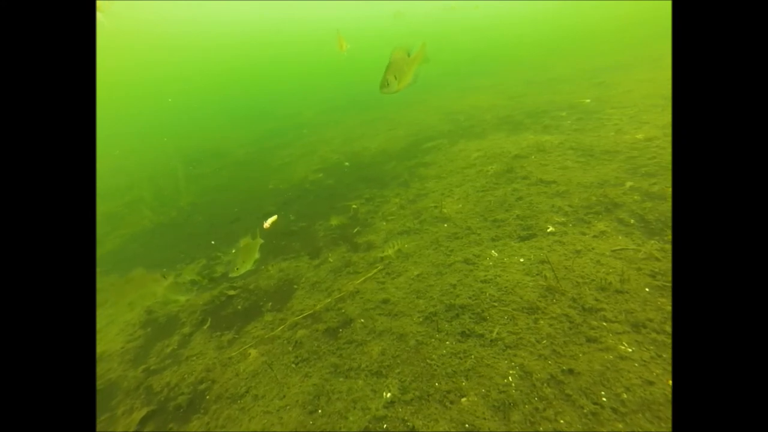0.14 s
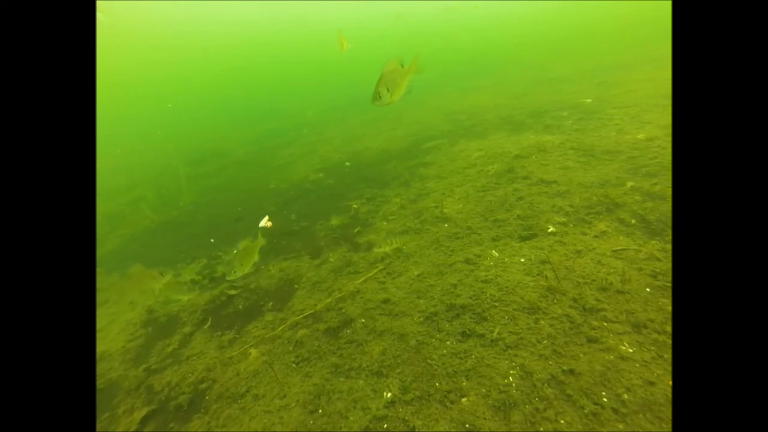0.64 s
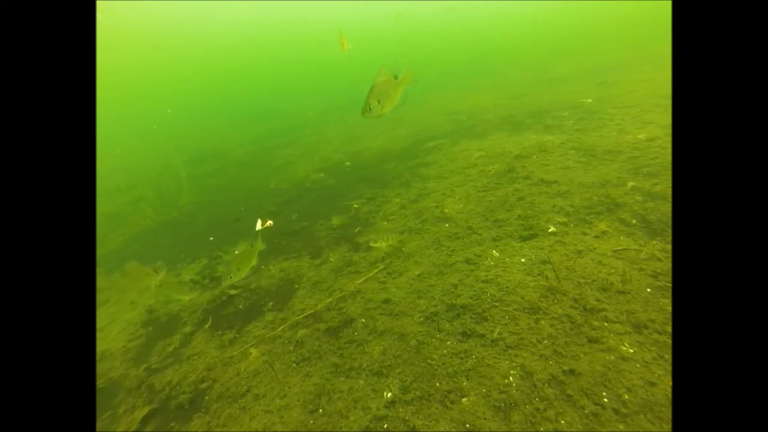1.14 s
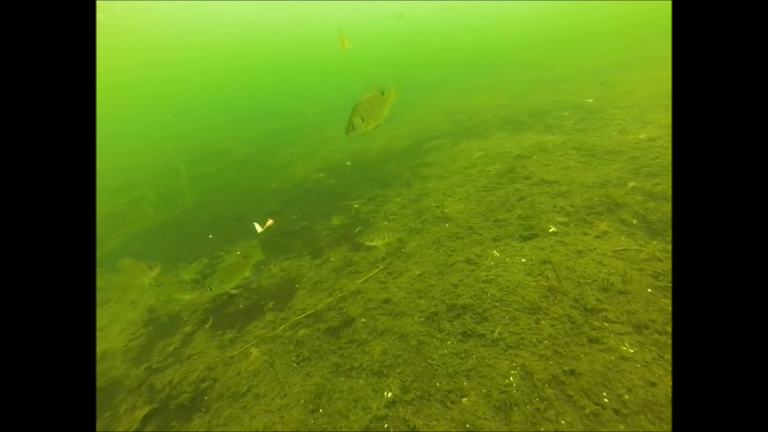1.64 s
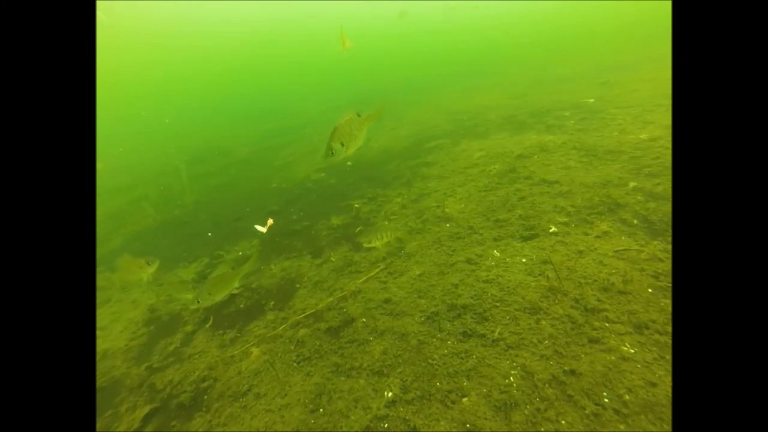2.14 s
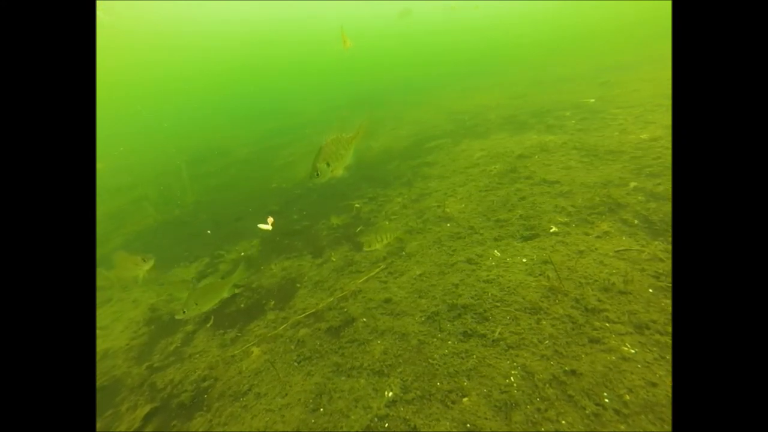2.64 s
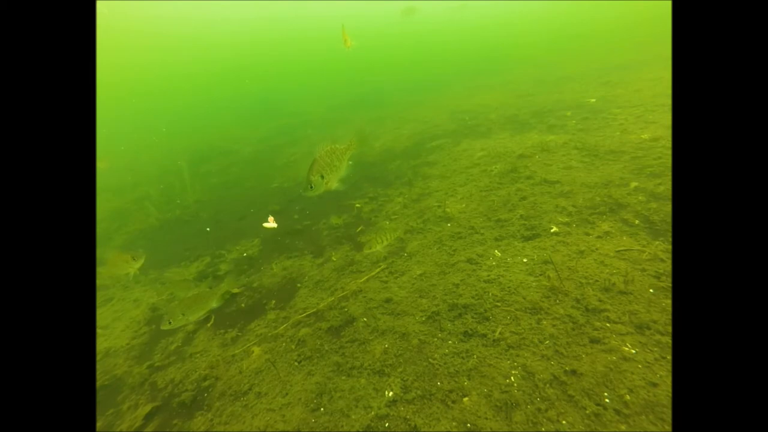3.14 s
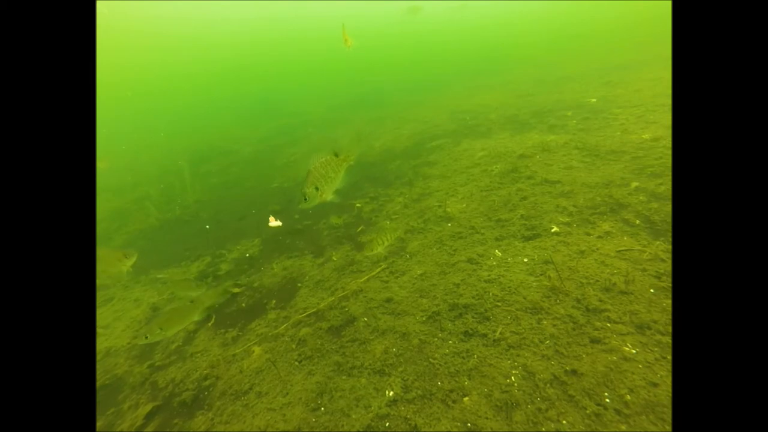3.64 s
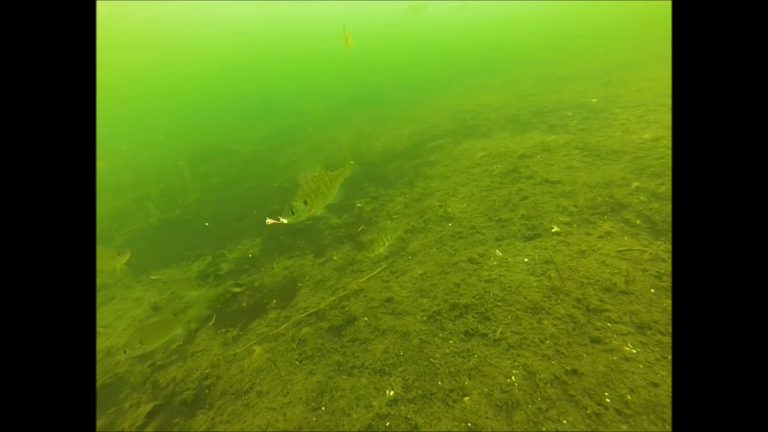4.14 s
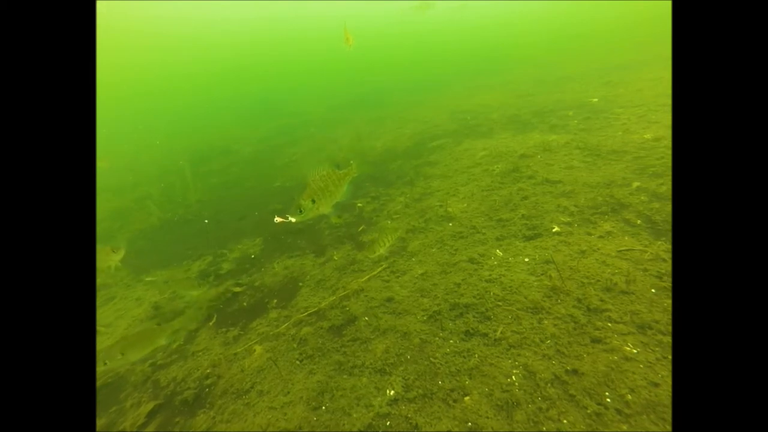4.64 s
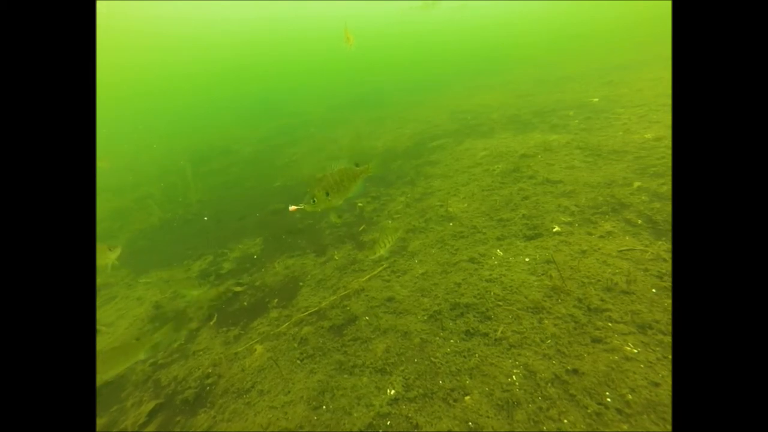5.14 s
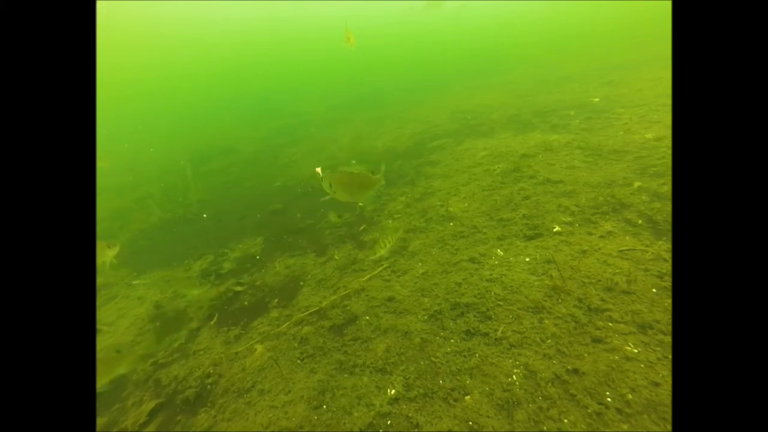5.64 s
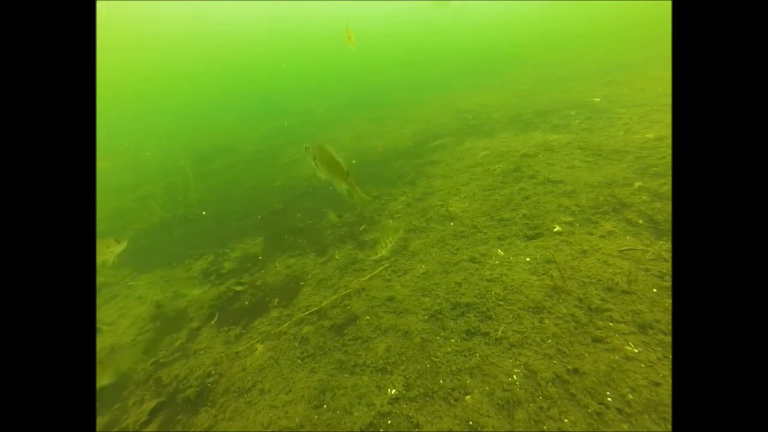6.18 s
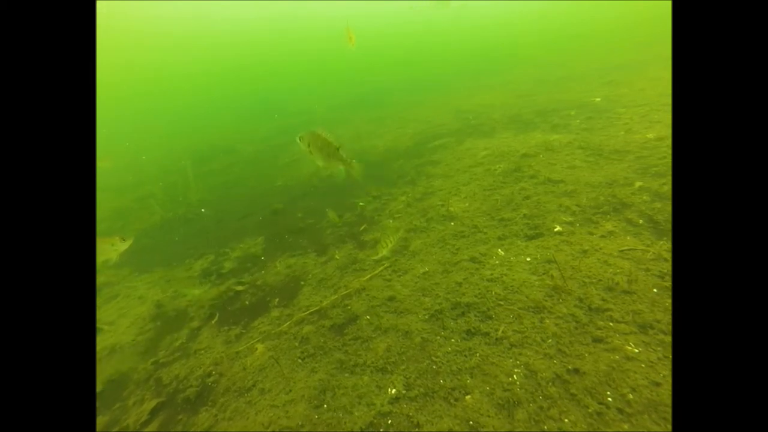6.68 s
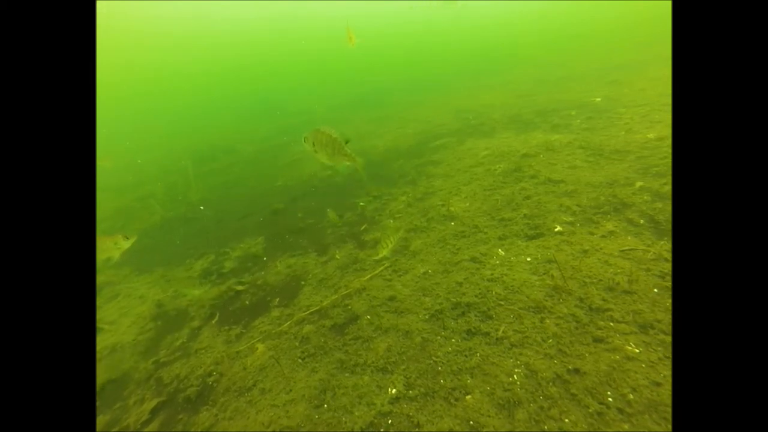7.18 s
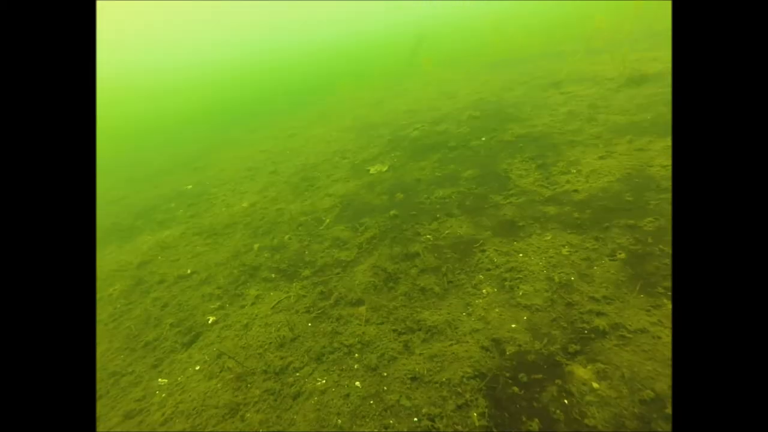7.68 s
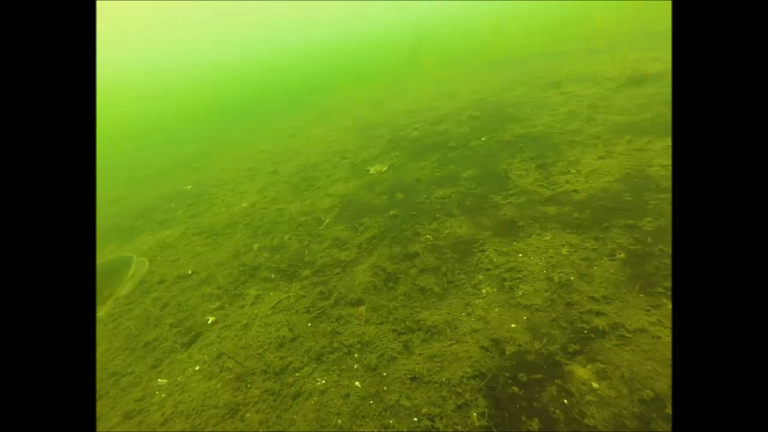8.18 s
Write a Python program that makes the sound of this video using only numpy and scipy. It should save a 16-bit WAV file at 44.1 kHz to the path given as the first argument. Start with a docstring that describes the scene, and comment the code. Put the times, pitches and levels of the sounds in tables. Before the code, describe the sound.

Under a frozen lake, hard hollow clicks and knocks with short rattling echoes come unevenly, a final loud crack stops dead, leaving quiet hiss.

```python
"""Ice cracks ring out from the very start, near and far, heard under a frozen lake inside a sealed housing.
Each is a click, a short bundle of ice-and-bed echoes and a dying rumble, all noise rung through resonances.
Some ping or thump, some send a dull forerunner through the faster ice, and one crisp snap sounds near. All the
ice sounds and their ringing break off at once at 7.54 s; a faint crack follows late, over steady preamp hiss
made of shaped noise."""
import sys
import numpy as np
from scipy import signal
from scipy.fft import rfft, irfft
from scipy.io import wavfile

SR = 44100
rng = np.random.default_rng(int(sys.argv[2]) if len(sys.argv) > 2 else 0)


def wav_out(sig):
    """Save sig, one row per channel (or a flat mono array), as 16-bit PCM at SR to the path in sys.argv[1]."""
    wavfile.write(sys.argv[1], SR, np.round(np.clip(np.atleast_2d(sig).T, -1, 1) * 32767).astype(np.int16))


def decibels_to_gain(level_db):
    """Convert a level in decibels to a linear amplitude gain (20 dB per decade)."""
    exponent = np.asarray(level_db, float) / 20
    return 10 ** exponent


N = 366030   # length in samples
STOP_S = 7.538   # everything that is still ringing stops dead here
TOP_HZ = 15400   # upper end of the snap; the top cut lies just above


def rms_one(x):
    """Scales each row to rms 1."""
    return x / np.sqrt(np.mean(x ** 2, axis=-1, keepdims=True) + 1e-20)


def drift(rate_hz):
    """Slow chance of rms 1: noise through two equal one-pole low-passes."""
    r = np.exp(-2 * np.pi * rate_hz / SR)
    noise = rng.standard_normal(N + 4000)
    return rms_one(signal.lfilter([1], [1, -2 * r, r * r], noise)[4000:])   # drops the filter's run-in


def add(out, start_s, piece):
    """Lays a piece into out; what starts before the stop ends at the stop."""
    start, stop = max(round(start_s * SR), 0), round(STOP_S * SR)
    end = stop if start < stop else N
    piece = piece[:end - start]
    out[start:start + len(piece)] += piece


def band(x, low_hz, high_hz, order=2):
    """Butterworth band-pass."""
    return signal.sosfilt(signal.butter(order, [low_hz, high_hz], "band", fs=SR, output="sos"), x)


def resonance_poles(hz, width_hz):
    """A two-pole resonance: the narrower it is, the longer it rings; returns pole radius and denominator."""
    r = np.exp(-np.pi * width_hz / SR)
    return r, [1, -2 * r * np.cos(2 * np.pi * hz / SR), r * r]


def resonate(x, modes):
    """Parallel housing resonances of alternating sign; white noise keeps its rms."""
    probe = np.stack([x, signal.unit_impulse(N)]) + 1e-18   # the impulse shows the gain to take out
    out = 0
    for k, (hz, width_hz, db) in enumerate(modes):
        r, poles = resonance_poles(hz, width_hz)
        zeros = np.array([1, 0, -1]) * (1 - r * r) / 2
        out = out + (-1) ** k * decibels_to_gain(db) * signal.lfilter(zeros, poles, probe)
    rung, impulse_response = out
    return rung / np.sqrt(np.sum(impulse_response ** 2))


# A typical crack: level, then bass, upper-mid and treble against that level (dB)
TYPICAL_DB, TYPICAL_BASS_DB, TYPICAL_UPPER_DB, TYPICAL_TREBLE_DB = -33, -11, -11, -20.5

# The cracks of the sheet, near and far. Each row: time of the crack in seconds, level in dB,
# then bass, treble and tail trims in dB against that level.
CRACKS = [(.0025, -29.5, -2.5, -26, -9.5), (.0313, -39, -4.5, -23, 1), (.2164, -42.5, -8, -14, -13.5),
          (.3316, -41.5, -12.5, -26, -3.5), (.392, -29, -6.5, -31, -6.5), (.4968, -28.5, -9.5, -33, -9),
          (.5094, -35.5, -19, -21, -11.5), (.6384, -38, -10, -20, -14), (.6913, -7, -8.5, -22, -13.5),
          (.8515, -33, -8, -31, -12), (.9438, -45, -18, -18, -10), (.9887, -38, -6, -17, -16),
          (1.1214, -40, -6.5, -22, -10), (1.2007, -49, -4, -13, -12), (1.2496, -39.5, -14, -35, -12),
          (2.1989, -46, -10, -13, -11), (2.2278, -33, -16, -40, -4.5), (2.2573, -29.5, -6, -13.5, -15),
          (2.4179, -30, -7, -21, 0), (2.5676, -18.5, -7, -31, -11), (2.7427, -39.5, -10, -22, -3.5),
          (2.7786, -29.5, -8.5, -27.5, -3), (2.8335, -15, -9.5, -23, -14.5), (2.9444, -36.5, -1, -25, -19),
          (2.9736, -41, -6.5, -22, -1), (3.0024, -41, -10, -21, -0.5), (3.0709, -42, -12, -24, -4.5),
          (3.1228, -43, -13, -27, -5), (3.2256, -26.5, -2.5, -14, -14.5), (3.2444, -24, -5, -38, -13.5),
          (3.2584, -30.5, 4, -31, -16.5), (3.3328, -32.5, -11, -28, -12), (3.3468, -32.5, -21, -25.5, -8.5),
          (3.4875, -47.5, -22, -16, -9), (3.5239, -49, -22, -26, -9), (3.5603, -47, -13, -17, -5.5),
          (3.6356, -11.5, -7.5, -20.5, -8.5), (3.6594, -31, 8.5, -25, -12), (3.7963, -9.5, -22, -20, -13.5),
          (3.8272, -19, -2, -32.5, -14.5), (3.933, -36.5, -16, -13, -4.5),
          (4.0826, -29.5, -15.5, -27.5, -9.5), (4.2308, -45, -6, -17, -3.5), (4.2502, -36, -7, -16.5, -12),
          (4.3046, -44.5, -11, -32, -4.5), (4.3939, -50, -8, -24, -1.5), (4.4842, -21, -6, -27, -8),
          (4.5121, -23, -10.5, -24, -4), (4.5321, -17, -6, -37, -12), (4.5805, -37.5, 6, -15, -7.5),
          (4.6094, -21.5, -9.5, -25, -8), (4.6574, -38.5, -13, -19, 1.5), (4.7524, -39.5, -5, -20, -10),
          (4.7995, -40, -5, -17, -12), (4.8174, -41.5, -17, -25, -1.5), (4.8569, -28.5, -6.5, -29, -14.5),
          (4.8728, -28, -13, -32, -11), (4.9034, -34.5, -12, -16, -8.5), (4.9576, -34, -8, -24, -9.5),
          (5.0134, -47.5, -13, -5, -17), (5.1168, -45.5, -15, -20, -1), (5.1367, -41.5, -13, -27, -9.5),
          (5.2395, -43, -7.5, -31, -6.5), (5.2824, -30.5, 1, -18.5, -14), (5.2954, -29.5, -10, -25, -5),
          (5.3921, -44.5, -19, -20, -4), (5.4839, -47, -13, -11, 1), (5.5548, -39.5, -4, -16, -20),
          (5.7414, -41, -6, -15.5, -14), (5.8456, -35.5, -9.5, -21, -16), (5.883, -36.5, -7, -38, -6.5),
          (5.8944, -40, -4, -30, -21), (5.9209, -31.5, -5, -25.5, -9.5), (6.0023, -42, -36, -19, -3.5),
          (6.0546, -40, -15, -19, -12), (6.1025, -48, -17, -20, -2), (6.1104, -49, -7, -22, -7),
          (6.1589, -42.5, -14, -22, -4), (6.1954, -47, -8, -22, -10), (6.3405, -37, -3, -24, -12),
          (6.3714, -18.5, -0.5, -18, -15), (6.4164, -43, 6, -29, -20), (6.557, -43.5, -19, -24, -8),
          (6.5839, -31, -12.5, -24, -13), (6.6997, -25, -7, -27, -12.5), (6.8438, -30, -1.5, -19.5, -10),
          (6.8628, -30.5, -22, -22, -4.5), (6.9034, -40, -12, -22, -3), (6.9341, -38.5, -7.5, -19.5, -3),
          (7.1516, -36, -9.5, -27, -13), (7.233, -41.5, -10, -15, -8), (7.2479, -39.5, -28, -11, -14),
          (7.3771, -8.5, 2, -17.5, -12), (7.385, -13, 11, -15, -23), (7.3916, -4.5, -26, -30, -16),
          (7.401, -9, -17, -28, -19), (7.4909, -33.5, -14, -13.5, -2.5), (8.2661, -51, -24.5, -9, -12)]


def crack_rows():
    """The listed cracks and far ones that come at random while the sheet is working."""
    count, from_s, to_s, spread_db, far_db, far_tail_db = 10, 2.3, 6.3, 2.5, -51, -3.5
    when = from_s + rng.random(count) * (to_s - from_s)
    spread = spread_db * rng.standard_normal((count, 4))
    far = spread + [far_db, TYPICAL_BASS_DB, TYPICAL_TREBLE_DB, far_tail_db]
    return np.vstack([CRACKS, np.column_stack([when, far])])


def upper_mid_share(rows):
    """Upper-mid dB against a crack's level: heavy and bassy cracks are duller, bright ones sharper."""
    start_s, level_db, bass_db, treble_db, _ = rows.T
    share_db = TYPICAL_UPPER_DB - 0.038 * (level_db - TYPICAL_DB)   # slopes in dB per dB
    share_db -= 0.058 * (bass_db - TYPICAL_BASS_DB)
    share_db += 0.11 * (treble_db - TYPICAL_TREBLE_DB)
    return share_db - 6.5 * (start_s > 7.3)   # the last great crack and what follows are duller still


def cracks(rows, level_db, clatter, early_s, rise_s, first_db, bundle_t60, bundle_db, tail_db, tail_t60):
    """First arrivals, echo bundles and lumpy tails of all cracks in one register."""
    t = np.arange(SR // 2) / SR
    onset = 1 - np.exp(-t / max(rise_s, 1e-4))
    bundles = rms_one(rng.standard_normal((len(rows), 40, SR // 1000)))   # even energy every millisecond
    bundles = bundles.reshape(len(rows), -1)
    bundle_shape = onset * decibels_to_gain(bundle_db - 60 * t / bundle_t60)
    bundles = bundles * bundle_shape[:bundles.shape[1]]
    bundles[:, round(rise_s * SR)] += decibels_to_gain(first_db)   # the direct path is one sharp click
    tail = onset * decibels_to_gain(tail_db - 60 * t / tail_t60)
    out, tail_power = np.zeros(N), np.zeros(N)
    for (s, *_, trim_db), db, bundle in zip(rows, level_db, bundles):
        add(out, s - early_s, decibels_to_gain(db) * bundle)
        add(tail_power, s - early_s, (decibels_to_gain(db + trim_db) * tail) ** 2)
    echoes_per_s = 5000.0   # separate late echoes in a tail
    echoes = rms_one(rng.standard_normal(N) * (rng.random(N) < echoes_per_s / SR))
    return out + np.sqrt(tail_power) * echoes * clatter


# Forerunners through the ice. Each row: first heard in seconds,
# lead on the water-borne crack in seconds, level in dB at the end of the swell.
FORERUNNERS = [(0.38, 0.004, -46), (0.649, 0.042, -31.5), (2.386, 0.052, -43.5), (2.551, 0.011, -32.5),
               (2.811, 0.019, -35.5), (3.2, 0.018, -40.5), (3.588, 0.056, -34), (3.763, 0.05, -30),
               (4.067, 0.0037, -47), (4.44, 0.036, -43.5), (6.346, 0.021, -35.5), (7.351, 0.024, -22)]


def forerunners(faint_db):
    """Noise that swells from its first arrival until the crack itself comes, then dies."""
    power, t = np.zeros(N), np.arange(SR // 4) / SR
    for s, lead_s, db in FORERUNNERS:
        swell_db = faint_db * np.clip(1 - t / lead_s, 0, 1)
        decay_db = -60 * np.maximum(t - lead_s, 0) / 0.25
        add(power, s, (np.minimum(t / .003, 1) * decibels_to_gain(db + swell_db + decay_db)) ** 2)
    return np.sqrt(power) * rng.standard_normal(N)


# How a crack unfolds, one row per register from bass to air. Each row: onset before the crack time in
# seconds, rise constant in seconds, first arrival in dB, echo bundle t60 in seconds, bundle level in dB,
# tail level in dB, tail t60 in seconds.
REGISTERS = [(.002, 0.001864, 13, 0.029, -11, 1.5, 0.4), (0.001988, .0012, 10, 0.075, -9, -5, 0.37),
             (0.0024, 0.00065, 16.5, 0.026, 2, 5.5, 0.32), (0.0028, 0.0011, 2, 0.039, -1, 0.5, 0.32),
             (0.0035, 0.00021, -16.5, 0.015, -7, -12, 0.39)]
# Housing resonances by register. Each row: pitch in Hz, width in Hz, level in dB within its register.
BASS_MODES = [(504.4, 238, -6.5), (613, 234, -2.5), (791, 138, 2), (926, 149, -3)]
# Each row: pitch in Hz, width in Hz, level in dB.
MID_MODES = [(1257, 66, -7.5), (1372, 76, -8.5), (1650, 83, -0.5), (1805, 65.6, 1), (2404, 250, -1)]
# Each row: pitch in Hz, width in Hz, level in dB.
UPPER_MODES = [(2480, 180, 3.5), (2822, 152, 1.5), (3012, 120, -3.5), (3610, 240, -8.5), (4015, 330, -18)]
# Each row: pitch in Hz, width in Hz, level in dB.
TREBLE_MODES = [(3910, 440, 1.5), (6060, 1290, -3.5), (6790, 530, 3), (7960, 2000, -14)]
# Each row: pitch in Hz, width in Hz, level in dB.
AIR_MODES = [(9750, 3000, 7.5), (13000, 1700, -6)]


def ringing_ice():
    """Cracks and forerunners ring the housing register by register, each through its own band."""
    rows = crack_rows()
    _, level_db, bass_db, treble_db, _ = rows.T
    upper_db = upper_mid_share(rows)
    clatter = decibels_to_gain(0.5 * drift(150))   # late echoes come in clumps that all registers share
    bass = cracks(rows, level_db + bass_db, clatter, *REGISTERS[0])
    bass += forerunners(faint_db=-13.5)
    mid = cracks(rows, level_db, clatter, *REGISTERS[1])
    mid += decibels_to_gain(-9.5) * forerunners(faint_db=-40.5)
    upper = cracks(rows, level_db + upper_db, clatter, *REGISTERS[2])
    treble = cracks(rows, level_db + treble_db, clatter, *REGISTERS[3])
    air = cracks(rows, level_db + treble_db, clatter, *REGISTERS[4])
    ice = band(resonate(bass, BASS_MODES), 280, 1000, order=3)
    ice += band(resonate(mid, MID_MODES), 950, 2210, order=3)
    ice += band(resonate(upper, UPPER_MODES), 2700, 5200, order=3)
    ice += band(resonate(treble, TREBLE_MODES), 4000, 10000, order=3)
    return ice + band(resonate(air, AIR_MODES), 6600, 17000)


# Short pings that some cracks carry. Each row: start in seconds, peak level in dB, pitch in Hz,
# t60 of the rattle in seconds.
PINGS = [(.3305, -48, 2500, .03), (.3921, -30, 2440, 0.023), (0.391, -39, 3600, .02),
         (.4955, -41, 2480, .035), (.8515, -39, 2480, .07), (.989, -42, 1700, 0.058),
         (1.1209, -52, 2930, .06), (1.2007, -53, 3040, 0.055), (1.2496, -49, 2820, .05),
         (2.2272, -37, 2510, 0.037), (2.2575, -43, 1820, .03), (2.4179, -29, 2710, 0.044),
         (2.742, -36, 2520, .025), (2.742, -47, 3600, .02), (2.7775, -51, 4500, 0.026),
         (2.833, -25, 2300, 0.12), (3.2258, -32, 2300, 0.11), (3.257, -33, 2800, 0.039),
         (3.637, -24, 2730, 0.066), (3.795, -21, 2740, 0.072), (4.304, -42, 2660, 0.037),
         (4.609, -30, 2740, .04), (4.818, -47, 2600, 0.028), (4.856, -45, 2730, 0.054),
         (5.741, -51, 2720, 0.058), (5.745, -44.5, 800, 0.063), (5.7902, -50.5, 2450, 0.033),
         (5.845, -38, 2560, .05), (5.846, -36, 1700, 0.072), (5.8825, -47, 2400, .03),
         (5.8949, -38, 2540, .03), (6.1017, -43, 2560, .025), (6.1104, -43, 2580, .025),
         (6.159, -39, 2520, .04), (6.341, -41, 2600, .03), (6.372, -26.5, 2330, 0.14),
         (6.374, -25, 1650, .1), (6.557, -43, 2050, .03), (6.8435, -30.5, 515, 0.017),
         (7.1504, -45.5, 2670, .05), (7.3761, -20, 2320, 0.069), (7.377, -13, 620, 0.086),
         (7.378, -22, 3630, .03), (7.388, -16, 1406, 0.21), (7.3992, -18.5, 2290, .1),
         (8.266, -51.5, 2940, .05)]


def pings():
    """A click and a dying rattle, twice through the same resonance for steep sides."""
    width_hz, rise_s, click_db = 300, .001, 18   # the click is the blow that starts a ping
    out, t = np.zeros(N), np.arange(SR // 8) / SR
    for (s, db, hz, t60), noise in zip(PINGS, rng.standard_normal((len(PINGS), len(t)))):
        blow = noise * decibels_to_gain(-60 * t / t60) * np.minimum(t / rise_s, 1)
        blow[round(rise_s * SR)] += decibels_to_gain(click_db)
        _, poles = resonance_poles(hz, width_hz)
        once = signal.lfilter([1, 0, -1], poles, blow)
        tone = signal.lfilter([1, 0, -1], poles, once)
        add(out, s, decibels_to_gain(db) * tone / np.abs(tone).max())
    return out


def snap():
    """One crisp, near snap: a few milliseconds of bright noise."""
    start_s, db, t60, from_hz = 2.2578, -45, .01, 2600   # level before the band-pass
    out, t = np.zeros(N), np.arange(SR // 20) / SR
    add(out, start_s, decibels_to_gain(db - 60 * t / t60) * rng.standard_normal(len(t)))
    return band(out, from_hz, TOP_HZ)


# Some cracks, heavy and light, also bring a low thump. Each row: start in seconds, pitch near the bottom
# of the band in Hz, level in dB before the decay, t60 in seconds.
THUMPS = [(.002, 379, -46.5, 0.68), (.66, 362, -43, 0.76), (2.42, 367, -50.5, 1), (2.57, 393, -46, 0.52),
          (3.634, 268, -38, 0.39), (3.64, 338, -42, 1), (3.795, 370, -42.5, 0.58), (4.492, 355, -42, 0.91),
          (6.844, 300, -32, 0.041), (7.371, 166, -49, 0.6)]


def thumps():
    """Low thumps: short dying noise, under an octave wide."""
    out, t = np.zeros(N), np.arange(SR // 4) / SR
    for (s, hz, db, t60), noise in zip(THUMPS, rng.standard_normal((len(THUMPS), len(t)))):
        body = rms_one(band(noise, hz / 1.09, hz * 1.5))
        add(out, s, body * np.minimum(t / 0.0048, 1) * decibels_to_gain(db - 60 * t / t60))
    return out


# Colour of the preamp hiss. Each row: frequency in Hz, relative level per Hz in dB.
HISS = [(20, 3.5), (100, -4), (300, -8.5), (600, -13), (1500, -17.5), (3000, -19.5), (5000, -26.5),
        (6500, -27.5), (9000, -33.5), (15000, -38)]


def hiss():
    """Smooth preamp noise, falling with frequency."""
    hz = np.maximum(np.arange(N // 2 + 1) * SR / N, 1)
    at_hz, db = np.transpose(HISS)
    colour = decibels_to_gain(np.interp(np.log(hz), np.log(at_hz), db)) * (hz > 15)
    shaped = rfft(rng.standard_normal(N)) * colour
    return decibels_to_gain(-59.5) * rms_one(irfft(shaped, N))   # rms before the low cut


def scene():
    """All the ice sounds with their sudden stop, over steady hiss."""
    ice = ringing_ice() + pings() + snap() + thumps()
    since_stop = np.arange(N) / SR - STOP_S
    fade = np.clip(-since_stop / .004, 0, 1)
    open_gain = np.where(since_stop < .1, fade, 1)   # the housing's own ring stops too
    return (open_gain * ice + hiss())[None]


def band_limit(x):
    """A steep low-pass at the top of the band."""
    return signal.sosfilt(signal.butter(12, 16340, fs=SR, output="sos"), x)


def record(dry):
    """A gentle low cut at 60 Hz and a steep top cut finish the mix."""
    low_cut = signal.butter(1, 60, "high", fs=SR, output="sos")
    top_cut = signal.cheby2(10, 40, TOP_HZ + 500, fs=SR, output="sos")   # 40 dB down from here up
    mix = signal.sosfilt(top_cut, signal.sosfilt(low_cut, dry))
    return band_limit(mix)


dry = scene()
out = record(dry)
wav_out(out)
```